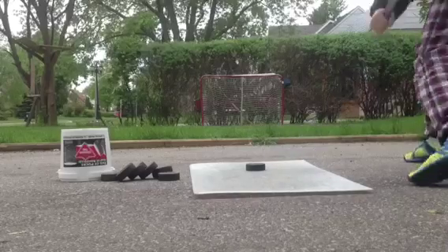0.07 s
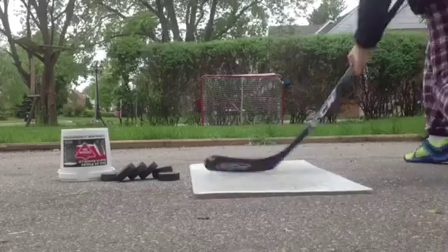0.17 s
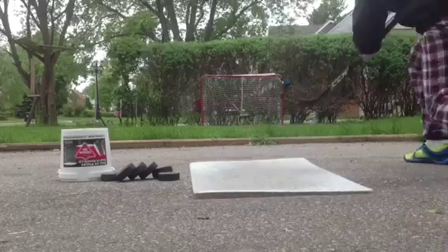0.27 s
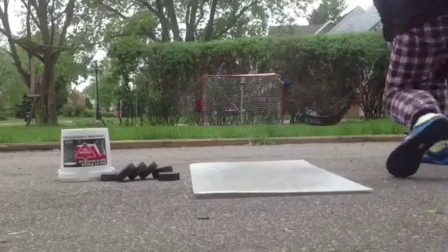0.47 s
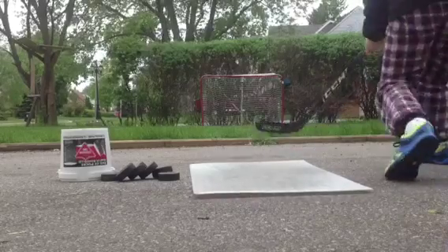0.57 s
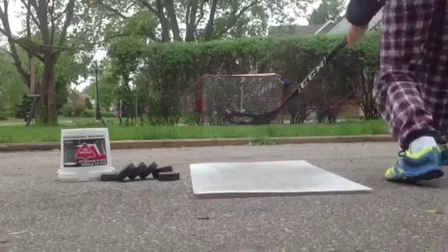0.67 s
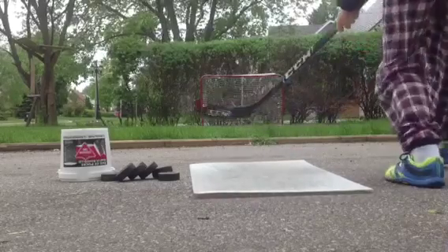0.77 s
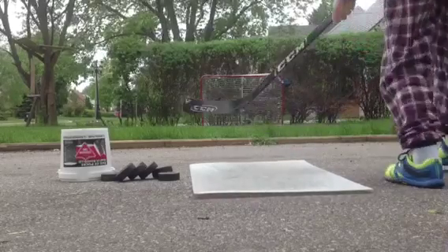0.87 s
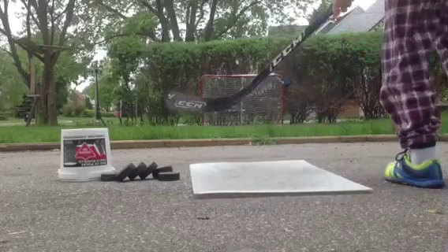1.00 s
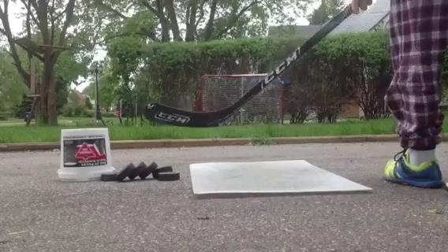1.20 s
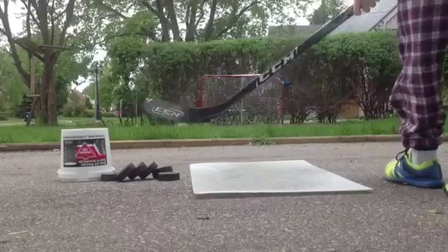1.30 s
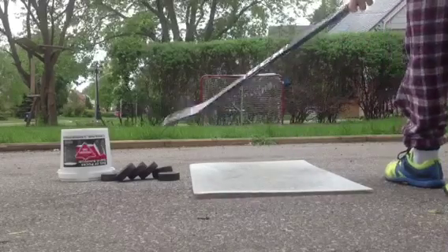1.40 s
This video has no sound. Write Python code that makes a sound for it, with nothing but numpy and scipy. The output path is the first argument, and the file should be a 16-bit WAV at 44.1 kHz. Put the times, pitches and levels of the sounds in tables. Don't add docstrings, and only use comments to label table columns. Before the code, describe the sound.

Close, sharp hockey shot outdoors on pavement: faint foot scuffs, a loud clipped crack with short hiss and street echoes, then a metallic goal rattle, its tail fading into soft thuds and distant town hum.

```python
import sys
import numpy as np
from scipy import signal
from scipy.fft import rfft, irfft
from scipy.io import wavfile
from scipy.ndimage import uniform_filter1d

SR = 44100
rng = np.random.default_rng(int(sys.argv[2]) if len(sys.argv) > 2 else 0)


def boost(x):
    u = np.asarray(x, float) / 20
    return 10 ** u


def to_wav(s):
    ch = np.atleast_2d(s).T
    pcm = np.round(np.clip(ch, -1, 1) * 32767)
    wavfile.write(sys.argv[1], SR, pcm.astype(np.int16))


N = 63945
T = np.arange(N) / SR

SLAP_S = [
    .2030,
    .2040,
    .2163,
    .2190,
]
# (level [dB], bright snap [dB], contact [ms])
SLAPS = [(-9, 21, .12), (-1.5, -14, 0.22), (1, -14, 0.19), (-8, -11.5, 0.2)]
RETURN_S = [.2262, .2307, .2335, .2405, .2553, .2578, .2605, .296, .38, .493]
# (level [dB], bright snap [dB], contact [ms])
RETURNS = [(-17, -8, 0.14), (-6.5, -11, 0.12), (-5.5, -4, 0.16), (-10.5, 10, 0.068), (-5.5, -14, 0.095),
           (-12, -8, 0.055), (-8.5, -12, 0.14), (-12, -14, 0.66), (-29, -6, 0.33), (-30, 0, 0.084)]
# (frequency [Hz], level [dB], time to fade by 60 dB [s])
SHAFT = [(269, -7.5, 0.025), (797, -4, .04), (1241, 0.5, 0.039), (1678, -0.5, 0.027), (2500, -9, 0.029),
         (3100, -17, 0.014), (3864, 2.5, 0.048), (5420, -5, .02), (5980, -14, 0.026), (7000, -24, 0.025)]
# (frequency [Hz], level [dB], time to fade by 60 dB [s])
BLADE = [(10200, -1, 0.0044), (11700, 7, 0.0041), (13300, -6, 0.0059)]
# (frequency [Hz], level [dB], time to fade by 60 dB [s])
PAD_THUMP = [(152, -20.5, 0.048), (427, -10.5, 0.034)]
# (frequency [Hz], level [dB per Hz])
GOAL_COLOUR = [(59, -57), (100, -20), (583, -9), (970, -10), (1450, -4), (2580, -7), (9410, -12.5),
               (13800, -9), (16000, -36)]
KNOCK_S = [
    .7558,
    .7595,
    .7660,
    .7720,
    .7765,
]
# (bright joints [dB], tubes [dB])
KNOCK_DB = [(2, -4.5), (-1.5, -0.5), (-3.5, -4), (-10, -2), (-13, -1)]
# (frequency [Hz], level [dB], time to fade by 60 dB [s])
JOINTS = [(1360, 0, 0.033), (1860, 1, 0.039), (2317, -3, .04), (2750, -5, 0.037), (3960, -1, 0.068)]
# (frequency [Hz], level [dB], time to fade by 60 dB [s])
TUBES = [(576, -4.5, 0.077), (1476, 1.5, 0.084), (1157, -22, 0.61), (1416, -18, 0.64), (3710, -24, 0.28),
         (4390, -20, 0.23), (5060, -21, 0.38)]
# (start [s], first frequency [Hz], level [dB])
SWEEPS = [
    (.7575, 1194, -14),
    (.764, 2500, -19),
]
# (time [s], level [dB], pitch [Hz], time to fade by 60 dB [s])
THUDS = [(0.051, -37, 200, .03), (.140, -33, 490, 0.023), (.1445, -29, 500, 0.031),
         (0.6725, -20.5, 280, 0.016), (.682, -28, 214, .04), (0.846, -26, 169, 0.057),
         (1.033, -30, 480, 0.015), (1.040, -29.5, 767, 0.029), (1.047, -29.5, 600, 0.027),
         (.847, -39, 260, 0.018), (1.180, -33, 258, 0.023), (1.215, -33.5, 218, 0.023),
         (1.233, -36, 230, 0.022), (1.254, -31, 250, 0.018)]
# (time [s], level [dB])
TICKS = [
    (.0795, -37),
    (0.09, -31),
    (.1075, -34),
    (0.137, -35),
    (.141, -37),
    (.147, -24),
]
# (start [s], length [s], level [dB], low edge [Hz])
SCUFFS = [
    (0.083, 0.072, -44, 4470),
    (0.095, 0.077, -45, 900),
    (0.167, 0.032, -54, 4000),
    (.37, .025, -40.5, 8000),
    (0.473, 0.032, -52, 8000),
    (1.024, 0.051, -45, 400),
    (1.035, 0.091, -54.5, 8000),
]
# (frequency [Hz], level [dB], time to fade by 60 dB [s])
HEDGES = [(151, -30, 0.046), (500, -7.5, 0.15), (1480, -10, 0.25), (4000, -13, 0.71), (8800, -22.5, 0.62),
          (15000, -15.5, 0.26)]
# (frequency [Hz], level [dB], time to fade by 60 dB [s])
STREET = [(150, -18, 1.15), (500, -17, 0.74), (1490, -16.5, 1.21), (4000, -18.5, 1), (9400, -19, 0.52),
          (14800, -24, 0.43)]
BANDS_HZ = 125 * 2 ** np.arange(0, 7.4, .5)
# (frequency [Hz], level [dB])
GOAL_TILT = [(300, 5), (2000, -0.5), (6000, 1.5), (14000, 2.5)]
# (frequency [Hz], level [dB per Hz])
TOWN = [(15, -85), (25, -69), (134, -3.5), (317, -8), (591, -10), (677, -12), (734, -10.5), (14800, -41),
        (16000, -59)]

SHOT_DB, DETUNE = -11, 0.02
CRACK_DB, CRACK_T60_S, CRACK_TOP_HZ = 1, 0.032, 6800
HISS_DB, HISS_S, HISS_T60_S, HISS_HZ = -27.5, 0.042, 0.19, 10900
GOAL_S, GOAL_RISE_S, GOAL_HOLD_S, GOAL_FALL_S = 0.7557, 0.004, 0.031, 0.004
GOAL_DB, FRAME_DB = -12.5, -21.5
GOAL_SAG_DB, GOAL_TREBLE_SAG_DB, GOAL_SPLIT_HZ = -8, -13, 2200
SWEEP_S, SWEEP_HZ_PER_S = 0.0073, 650000
RETURN_LOW_HZ, SCATTER_RISE_S = 900, 0.016
GOAL_NEAR_DB, GOAL_FAR_DB = -12.5, -7
GOAL_SHELF_S, GOAL_SHELF_DB = 0.84, -3.5
TOWN_DB = -41.5
MIC_LOW_HZ, TOP_HZ, CEILING = 110, 15350, 0.95


def at(table, hz, col):
    table = np.array(table, float)
    return np.interp(np.log(np.maximum(hz, 1)), np.log(table[:, 0]), table[:, col])


def unit(x):
    return x / np.sqrt(np.mean(x ** 2))


def colour(x, table):
    hz = np.arange(N // 2 + 1) * SR / N
    return irfft(rfft(x) * boost(at(table, hz, 1)), N)


def band(x, lo_hz, hi_hz):
    edges = [lo_hz, min(hi_hz, 0.45 * SR)]
    return signal.sosfilt(signal.butter(2, edges, "band", fs=SR, output="sos"), x)


def fade(age_s, t60_s):
    return 1000.0 ** (-np.maximum(age_s, 0) / t60_s)


def hump(start_s, length_s):
    return np.sin(np.pi * np.clip((T - start_s) / length_s, 0, 1))


def ring(force, modes):
    out = np.zeros(N)
    for k, (hz, db, t60) in enumerate(modes):
        pole = np.exp(2j * np.pi * hz / SR - np.log(1000) / (t60 * SR))
        out += (-1) ** k * boost(db) * signal.lfilter([1], [1, -pole], force).imag
    return out


def push(s, ms):
    u = (T - s) / (ms / 1000)
    force = np.where((u > 0) & (u < 1), np.sin(np.pi * np.clip(u, 0, 1)), 0)
    return force / (ms * SR / 1000) * np.pi / 2


def walk(rate_hz):
    k = int(SR / rate_hz)
    steps = np.repeat(rng.standard_normal(N // k + 1), k)
    smooth = uniform_filter1d(uniform_filter1d(steps, k), k)
    return unit(smooth[:N])


def grit(spread_db):
    return unit(rng.standard_normal(N) * boost(spread_db * rng.exponential(size=N)))


def blows(times, rows):
    noise = boost(CRACK_DB) * unit(band(grit(2.8), 540, CRACK_TOP_HZ))
    out = np.zeros(N)
    for s, (db, snap_db, ms) in zip(times, rows):
        detune = 1 + DETUNE * rng.standard_normal(len(SHAFT))
        modes = [(hz * d, mode_db, t60) for (hz, mode_db, t60), d in zip(SHAFT, detune)]
        shaft = ring(push(s, ms), modes)
        crack = noise * (T > s) * fade(T - s, CRACK_T60_S)
        snap = boost(snap_db) * ring(push(s, 0.05), BLADE)
        out += boost(db) * (shaft + crack + snap)
    return boost(SHOT_DB) * out


def blade_hiss():
    age = T - SLAP_S[0]
    env = (age > 0) * fade(age - HISS_S, HISS_T60_S)
    noise = unit(band(grit(4.0), HISS_HZ / 1.18, HISS_HZ * 1.14))
    return boost(HISS_DB) * env * boost(2.0 * walk(250)) * noise


def shot():
    thump = ring(push(SLAP_S[2], 0.84), PAD_THUMP)
    return blows(SLAP_S, SLAPS) + thump + blade_hiss()


def goal_rattle():
    age = T - GOAL_S
    rise = np.clip(0.5 + age / GOAL_RISE_S / 2, 0, 1) * (age > 0)
    env = rise * np.exp(-np.maximum(age - GOAL_HOLD_S, 0) / GOAL_FALL_S)
    sag = np.clip(age / GOAL_HOLD_S, 0, 1)
    noise = unit(colour(grit(1.8), GOAL_COLOUR))
    low = band(noise, 100, GOAL_SPLIT_HZ)
    treble = noise - low
    return boost(GOAL_DB) * env * (low * boost(GOAL_SAG_DB * sag) + treble * boost(GOAL_TREBLE_SAG_DB * sag))


def goal_ring():
    joint_force, tube_force = np.zeros(N), np.zeros(N)
    for s, (joint_db, tube_db) in zip(KNOCK_S, KNOCK_DB):
        knock = push(s, 0.1)
        joint_force += boost(joint_db) * knock
        tube_force += boost(tube_db) * knock
    return boost(FRAME_DB) * (ring(joint_force, JOINTS) + ring(tube_force, TUBES))


def tube_sweeps():
    out = np.zeros(N)
    for s, hz, db in SWEEPS:
        age = T - s
        cycles = (hz + SWEEP_HZ_PER_S * age / 2) * age
        out += boost(db) * hump(s, SWEEP_S) * np.sin(2 * np.pi * cycles)
    return out


def goal():
    return goal_rattle() + goal_ring() + tube_sweeps()


def feet():
    thuds = sum(ring(push(s, 600 / hz), [(hz, db, t60)]) for s, db, hz, t60 in THUDS)
    tick_force = sum(boost(db) * push(s, 0.057) for s, db in TICKS)
    ticks = 6.0 * band(tick_force, 4800, 12500)
    scuffs = np.zeros(N)
    for s, length, db, lo_hz in SCUFFS:
        env = hump(s, length) ** 0.45 * boost(1.3 * walk(180))
        scuffs += boost(db) * env * unit(band(grit(2.3), lo_hz, 11000))
    return 2.25 * thuds + ticks + scuffs


def house_echoes():
    return band(blows(RETURN_S, RETURNS), RETURN_LOW_HZ, 16400)


def scatter(table):
    out = np.zeros(N)
    for hz in BANDS_HZ:
        noise = band(rng.standard_normal(N), hz / 1.195, hz * 1.242)
        out += boost(at(table, hz, 1)) * noise * fade(T, at(table, hz, 2))
    return np.clip(T / SCATTER_RISE_S, 0, 1) * out


def delay(x, s):
    return np.concatenate([np.zeros(int(s * SR)), x])[:N]


def street_tails():
    shot_tail = delay(scatter(HEDGES) + scatter(STREET), SLAP_S[1])
    goal_tail = boost(GOAL_NEAR_DB) * scatter(HEDGES) + boost(GOAL_FAR_DB) * scatter(STREET)
    goal_tail = delay(colour(goal_tail, GOAL_TILT), GOAL_S)
    shelf = boost(GOAL_SHELF_DB * np.clip((T - GOAL_SHELF_S) / 0.0043, 0, 1))
    return shot_tail + shelf * goal_tail


def town():
    hum = unit(colour(rng.standard_normal(N), TOWN))
    low = band(hum, 60, 340)
    gusts = boost(2.0 * walk(24.6)) - 1
    return boost(TOWN_DB) * (hum + low * gusts) * boost(0.51 * walk(3.7))


def scene():
    return (shot() + goal() + feet() + house_echoes() + street_tails() + town())[None]


def band_limit(x):
    return signal.sosfilt(signal.butter(12, 16330, fs=SR, output="sos"), x)


def record(dry):
    x = signal.sosfilt(signal.butter(2, MIC_LOW_HZ, "high", fs=SR, output="sos"), dry)
    x = signal.sosfilt(signal.ellip(8, 0.2, 30, TOP_HZ, fs=SR, output="sos"), x)
    mix = np.clip(x, -CEILING, CEILING)
    return band_limit(mix)


dry = scene()
out = record(dry)
to_wav(out)
```